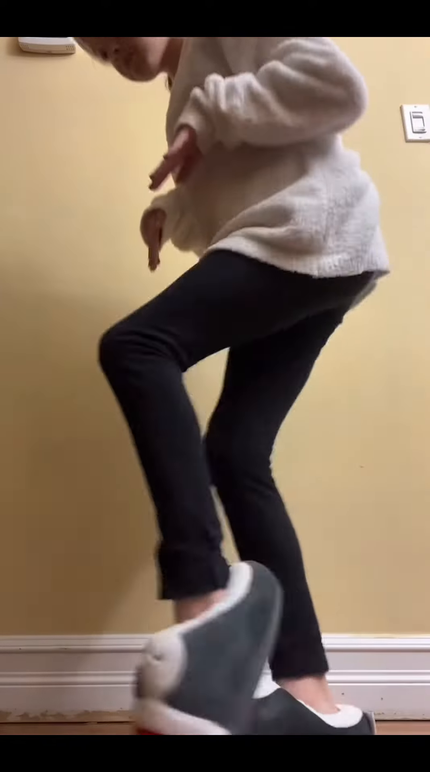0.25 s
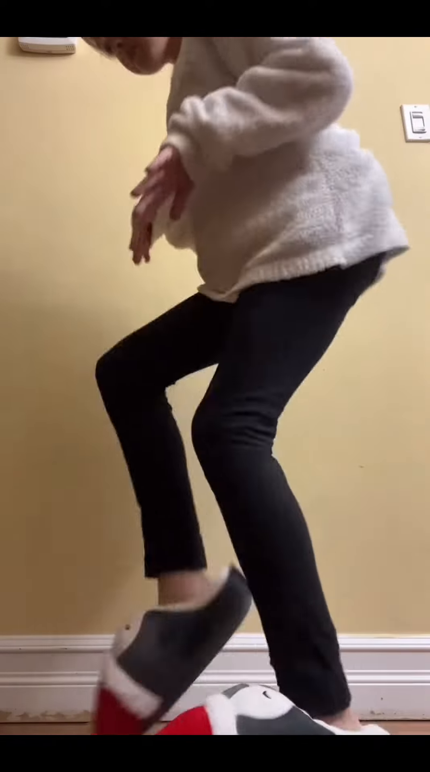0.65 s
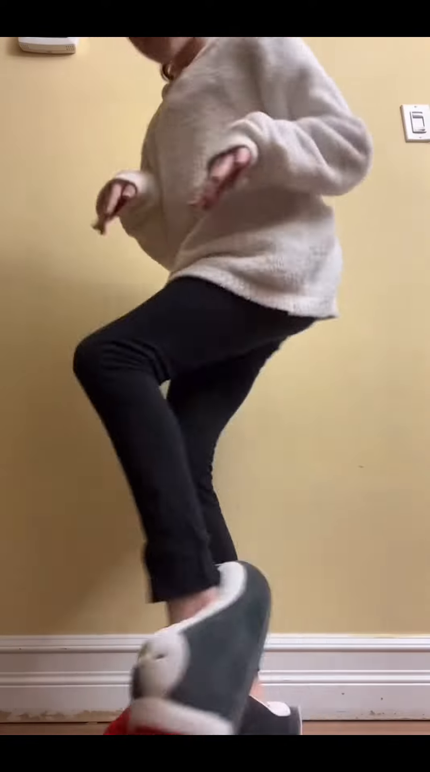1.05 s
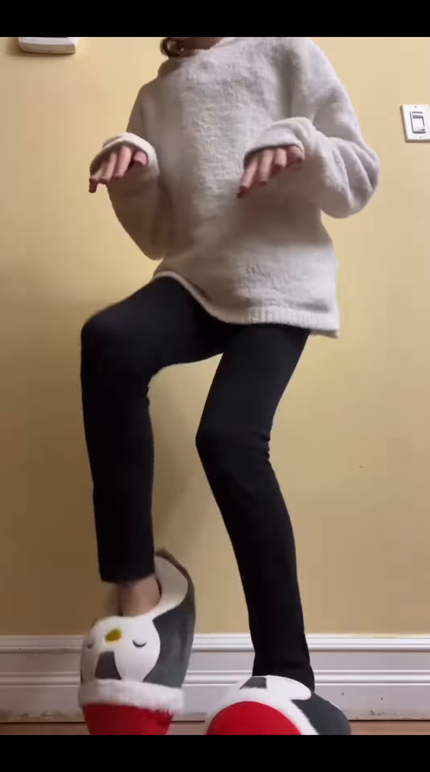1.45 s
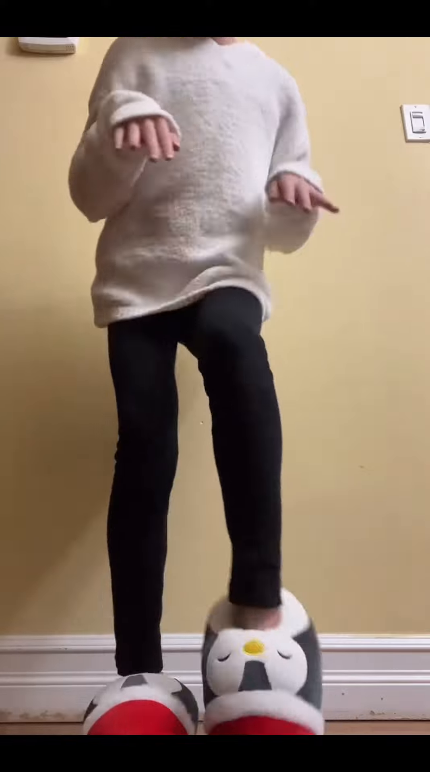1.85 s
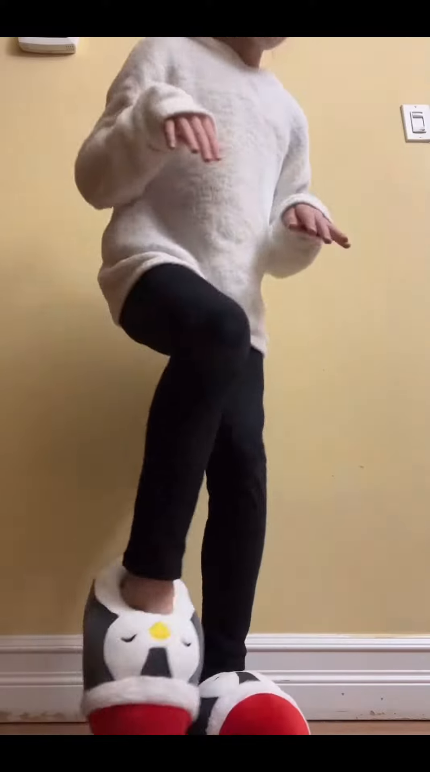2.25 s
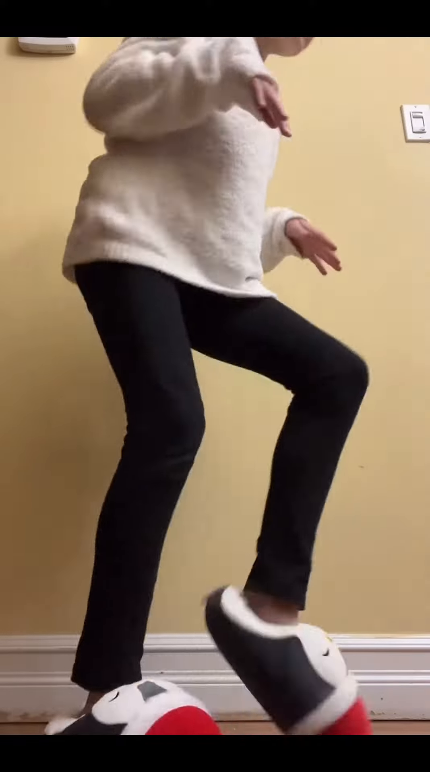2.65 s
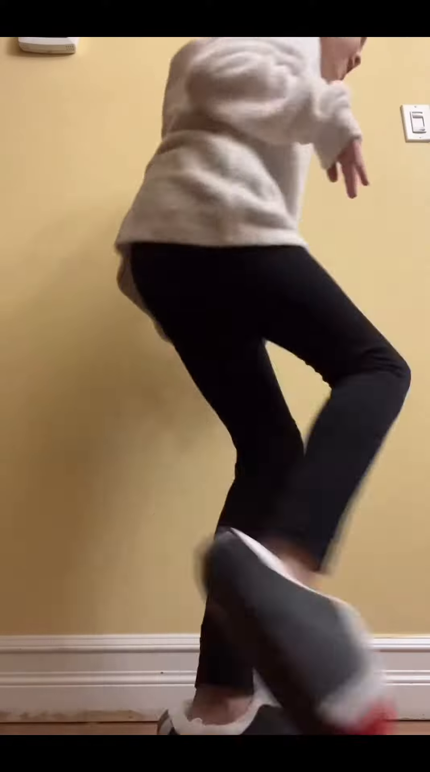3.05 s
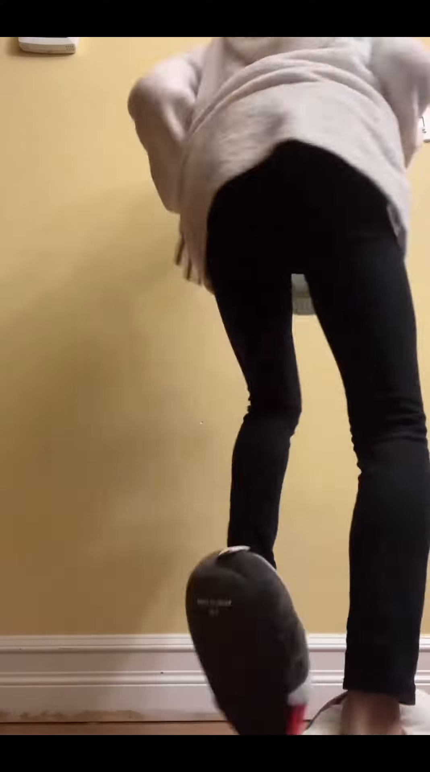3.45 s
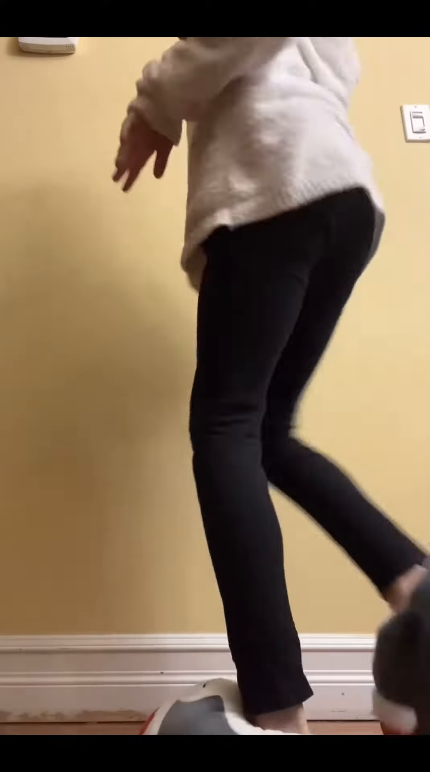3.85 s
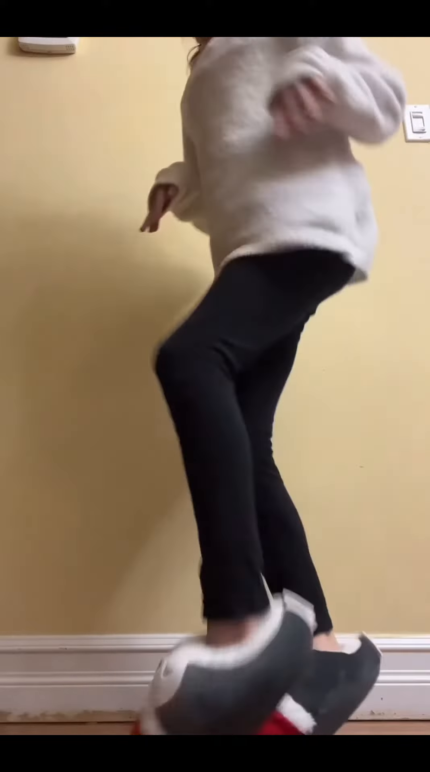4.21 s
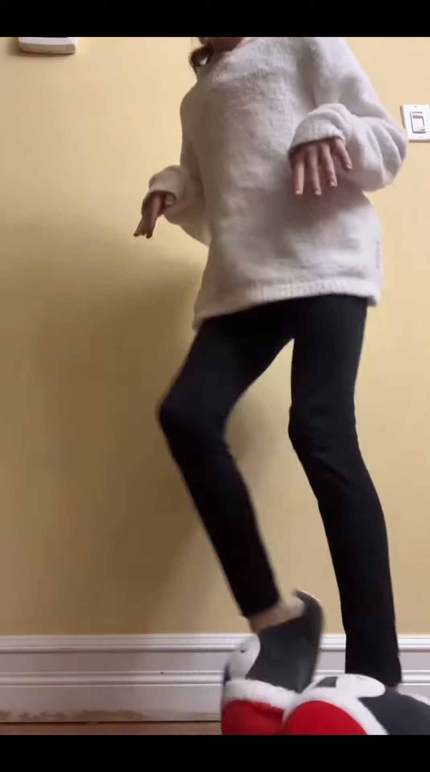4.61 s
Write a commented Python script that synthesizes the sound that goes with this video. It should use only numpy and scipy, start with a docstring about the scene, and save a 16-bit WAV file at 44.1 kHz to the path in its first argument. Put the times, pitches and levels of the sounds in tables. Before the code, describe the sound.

Soft, hissy swishes follow one another in a loose rhythm as plush slippers shuffle over varnished floorboards. Cushioned footfalls and small catching clicks fall between the slides. In the second half a sole squeaks shortly twice, and a few more scuffs lead to a slightly heavier step. The sound is close, in a small room with little echo, a quiet low rumble and a faint electrical hum.

```python
"""Soft swishes and dull pats: someone dances in plush slippers on a wooden floor, close by in a small room.
The cloth soles catch and slide by friction, push on the boards and squeeze air out as they land.
Twice a pivoting sole squeaks on the varnish by stick-slip motion; fast soles give tiny whistles.
Under it lie the low rumble of the house and a faint mains hum."""
import sys
import numpy as np
from scipy import signal
from scipy.fft import rfft, irfft, next_fast_len
from scipy.io import wavfile
from scipy.ndimage import map_coordinates

SR = 44100
rng = np.random.default_rng(int(sys.argv[2]) if len(sys.argv) > 2 else 0)


def log_audio(samples):
    """Write samples as a 16-bit WAV file to the path given in sys.argv[1]."""
    # one column per channel
    frames = np.atleast_2d(samples).T
    # limit to full scale, then quantise
    limited = np.clip(frames, -1, 1)
    pcm = np.round(limited * 32767).astype(np.int16)
    wavfile.write(sys.argv[1], SR, pcm)


N = 210562

# Spectrum of cloth rubbing on wood: frequency_hz, density_db
CLOTH_SPECTRUM = [(210, -16), (350, -10), (404, -3), (582, -7.5), (630, 1.5), (682, -1), (1050, 0.5),
                  (1350, 0.5), (1460, 2), (2760, 6), (5390, 3.5), (7170, 3.5), (9100, -14.5), (13800, -23),
                  (15600, -21)]
# A sole lands and slides, about every 0.4 s (scuff and sizzle are relative to the rub):
# start_s, rub_db, rise_s, fade_s, scuff_db, sizzle_db
SOLE_SLIDES = [(.04, -33, 0.093, .13, -5, -21), (.416, -34, 0.081, 0.17, -6, -14),
               (0.86, -33, 0.086, 0.049, -6.5, -11.5), (1.198, -39.5, 0.13, 0.14, -3.5, -9.5),
               (1.6, -40.5, 0.063, 0.087, -5, -23.5), (1.825, -34.5, 0.035, 0.083, -4, -8),
               (2.016, -41.5, .075, 0.11, -3, -14.5), (2.394, -42, 0.074, 0.15, -5, -25),
               (2.785, -39, 0.099, 0.17, -5, -14), (3.184, -35, 0.1, 0.15, -9.5, -6.5),
               (3.635, -35.5, 0.061, 0.33, -12.5, -11), (4.08, -37, 0.057, 0.1, -8, -4),
               (4.485, -42.5, .014, 0.19, -3.5, -9.5), (4.712, -28, 0.032, 0.039, -4, -4.5)]


def cloth_friction(scuff_hz=1900, hiss_hz=5600, sizzle_hz=8200):
    """Sliding friction: fibres slip as separate ticks under a light touch, a dense swish under weight."""
    # Resonances of the slipper: frequency_hz, width_hz, gain_db
    slipper_modes = [(605, 21, -25), (1330, 52, -2), (1585, 40, -8), (2550, 55, -44)]
    rub_db, pressure_db, speed_db = footwork()
    slips_per_s = 450 + 5.6e5 * amp(rub_db + pressure_db)
    tick_share = np.clip(0.38 - 0.04 * pressure_db, 0.05, 0.8)
    slips = np.sqrt(tick_share) * grains(slips_per_s, spread_db=5)
    slips += np.sqrt(1 - tick_share) * rng.standard_normal(N)
    slips *= amp(1.18 * wobble(170))  # the fibres let go in clumps
    slips = reflected(slips, delay_s=0.0006, share=0.25)  # off the floor
    slips = reflected(slips, delay_s=0.003, share=0.18)  # off the skirting board
    slips = coloured(slips + resonate(slips, slipper_modes), CLOTH_SPECTRUM)
    low = lambda f: 1 / (1 + (f / scuff_hz) ** 5)
    high = lambda f, edge_hz: 1 - 1 / (1 + (f / edge_hz) ** 8)
    scuff = unit(filtered(slips, low))
    rub = unit(filtered(slips, lambda f: 1 - low(f) - high(f, sizzle_hz)))
    sizzle = unit(filtered(slips, lambda f: high(f, sizzle_hz)))
    hiss = filtered(rub, lambda f: high(f, hiss_hz))
    bright_db = np.clip(1 + 0.1 * speed_db, -5, 3)  # a slow sole says "sh", a fast one "ss"
    rub = amp(bright_db) * hiss + amp(-0.4 * bright_db) * (rub - hiss)
    return amp(rub_db) * (rub + amp(pressure_db) * scuff + amp(speed_db) * sizzle)


def footwork(load_db_per_s=97.5, speedup_db_per_s=50, brush_scuff_db=-7.5):
    """Incoherent strokes add in power. In dB: rub, and scuff (pressure) and sizzle (speed) re rub."""
    # A foot pushes off and brushes away, fast and light: peak_s, rub_db, rise_s, fade_s, sizzle_db
    brushes = [(.252, -34, .187, 0.11, -4.5), (.683, -38.5, 0.14, 0.019, -3.5),
               (.73, -40.5, .03, 0.089, -2.5), (1.012, -35.5, 0.14, 0.15, 0), (1.421, -40.5, 0.08, 0.14, 1),
               (1.512, -41.5, .095, 0.016, -14), (1.759, -50.5, 0.18, 0.35, -4),
               (2.194, -44, 0.1, 0.087, -3), (2.265, -49.5, .045, 0.11, 1.5),
               (2.546, -47, 0.12, 0.26, -5.5), (2.612, -39.5, 0.023, 0.11, -2),
               (2.984, -53.5, 0.033, 0.32, 4), (3.04, -42.5, 0.028, 0.069, -17),
               (3.402, -38.5, .187, 0.16, -5), (3.83, -38, 0.097, 0.16, 0), (3.932, -40, 0.054, 0.045, -7),
               (4.253, -36, 0.065, 0.11, -3.5), (4.389, -50, 0.021, 0.083, -5), (4.664, -42, 0.1, 0.092, 4)]
    rub, scuff, sizzle = np.zeros((3, N))
    for start_s, rub_db, rise_s, fade_s, scuff_db, sizzle_db in SOLE_SLIDES:
        power, shift_s = stroke(start_s + rise_s, rub_db, rise_s, fade_s, rise_db=19)
        power *= np.arange(N) >= start_s * SR
        rub += power
        scuff += power * amp(scuff_db + load_db_per_s * shift_s) ** 2  # grows as the weight comes on
        sizzle += power * amp(sizzle_db + speedup_db_per_s * shift_s) ** 2  # starts dull, brightens
    for peak_s, rub_db, rise_s, fade_s, sizzle_db in brushes:
        power, shift_s = stroke(peak_s, rub_db, rise_s, fade_s, rise_db=21)
        rub += power
        scuff += power * amp(brush_scuff_db + load_db_per_s * shift_s) ** 2
        sizzle += power * amp(sizzle_db) ** 2
    return 10 * np.log10([rub, scuff / rub, sizzle / rub])


def stroke(peak_s, level_db, rise_s, fade_s, rise_db, fade_db=21, half_shift_s=0.069):
    """Power envelope of one stroke, and the time from its peak, limited to the shift of weight."""
    t = np.arange(N) / SR - peak_s
    drop_db = np.where(t < 0, rise_db * np.abs(t / rise_s) ** 1.255, fade_db * np.abs(t / fade_s) ** 0.88)
    power = amp(level_db - np.minimum(drop_db, 210)) ** 2
    return power, np.clip(t, -half_shift_s, half_shift_s)


def snags(t60_s=0.0068, crumble=0.51, cutoff_hz=9000):
    """Impulse response: the tread snaps free and rings, with a short crumble of fibres after the tick."""
    # The tread catches and lets go: start_s, peak_db
    releases = [(.0767, -30), (.195, -15.5), (.2047, -17), (.2225, -17.5), (.2518, -18), (.3752, -17.5),
                (.652, -26), (.6674, -21), (.6814, -22), (1.498, -21.5), (1.509, -18.5), (1.828, -28),
                (1.838, -22), (2.2656, -35), (2.603, -27), (3.0344, -22), (3.7226, -29), (3.8352, -15.5)]
    # Resonances of the tread: frequency_hz, width_hz, gain_db
    tread_modes = [(3660, 1400, 17), (6040, 920, 22)]
    out, t = np.zeros(N), np.arange(SR // 40) / SR
    for start_s, peak_db in list(releases) + fibre_catches():
        snap = (t == 0) + crumble * amp(-60 * t / t60_s) * rng.standard_normal(len(t))
        tick = softened(resonate(snap, tread_modes), cutoff_hz)
        add(out, start_s, amp(peak_db) * tick / np.abs(tick).max())
    return out


def fibre_catches(count=4, within_s=0.045, offset_db=-1, spread_db=4):
    """Static friction: fibres catch at first touch and at random just after. Gives start_s, peak_db."""
    ticks = []
    for (start_s, rub_db, *_), (when, size) in zip(SOLE_SLIDES, rng.random((len(SOLE_SLIDES), 2, count))):
        times_s = start_s + within_s * (when - when.min())
        ticks += zip(times_s, rub_db + offset_db + spread_db * (2 * size - 1))
    return ticks


def squeaks(slip_s=3e-5, rocking=0.89, grit=2.3):
    """Stick-slip oscillation: a pivoting sole grips and slips faster and more evenly, then lets go."""
    # One table per squeak: time_s, slip_rate_hz, gain_db, roughness (0 to 1)
    pivots = [
        [(3.394, 1200, -33, 0.59), (3.401, 1180, -32, 0.44), (3.4065, 1880, -21, 0.41),
         (3.4085, 1760, -14.5, .26), (3.412, 1840, -12, 0.15), (3.4142, 2200, -21, 0.22)],
        [(3.772, 740, -24, 0.5), (3.782, 700, -17.5, 0.11), (3.789, 960, -15, 0.26), (3.797, 1110, -17.5, .2),
         (3.8003, 1280, -12.5, 0.05), (3.8034, 1640, -9.5, 0.23), (3.8043, 440, -36, 0.4)],
    ]
    # Resonances of the sole: frequency_hz, width_hz, gain_db
    sole_modes = [(1640, 1170, -4), (3900, 3100, -9.5), (6400, 1200, -12)]
    out, t = np.zeros(N), np.arange(N) / SR
    for rows in pivots:
        rate_hz, gain_db, roughness = curves(rows)
        cycles = np.cumsum(rate_hz * (1 + 0.5 * roughness * wobble(1200))) / SR
        pulses = np.exp(-((cycles % 1 - 0.5) / rate_hz / slip_s) ** 2)
        sway = -rocking * np.cos(2 * np.pi * cycles)  # the whole sole rocks with each slip
        noise = grit * roughness * rng.standard_normal(N)
        force = (1 - roughness) * unit(pulses - pulses.mean()) + sway + noise
        sliding = (t > rows[0][0]) & (t < rows[-1][0])
        out += amp(gain_db) * force * sliding
    band_pass = lambda f: f ** 2 / (f ** 2 + 450 ** 2) / np.sqrt(1 + (f / 8800) ** 12)
    return filtered(resonate(out, sole_modes), band_pass)


def pats(attack_s=0.0012, padding_hz=600):
    """Cushioned impact: a padded foot excites the low modes of the boards, then settles."""
    # Weight comes down: start_s, peak_db, settle_s
    footfalls = [(0.323, -38.5, 0.029), (.381, -40.5, 0.12), (1.066, -41.5, 0.033), (1.387, -38, 0.069),
                 (1.448, -39, 0.021), (1.502, -37, 0.11), (1.745, -41.5, 0.09), (2.176, -41, .1),
                 (2.287, -41.5, 0.036), (2.474, -42.5, 0.43), (4.417, -34.5, .04), (4.443, -41, 0.034),
                 (4.644, -41, 0.019), (4.741, -29.5, 0.24)]
    # Modes of the floorboards: frequency_hz, width_hz, gain_db
    board_modes = [(134, 17, -10.5), (207, 32, 4), (240, 210, 1), (340, 320, -12), (510, 400, -15)]
    out, t = np.zeros(N), np.arange(SR // 5) / SR
    for start_s, peak_db, settle_s in footfalls:
        push = np.exp(-t / attack_s) * t / attack_s
        settling = 2.5 * amp(-30 * t / settle_s) * rng.standard_normal(len(t))
        thud = softened(resonate(push + settling, board_modes), padding_hz)
        add(out, start_s, amp(peak_db) * thud / np.abs(thud).max())
    return out


def air_puffs(relative_width=0.98, cloth_gain=0.033):
    """Cavity resonance: air squeezed from under a sole puffs hollowly, with a brush of cloth on top."""
    # A sole is pressed flat on trapped air: start_s, level_db, pitch_hz, length_s
    landings = [(.12, -56, 1100, 0.02), (0.3776, -32, 922, 0.0024), (0.505, -40.5, 670, 0.021),
                (1.034, -39.5, 1340, 0.025), (1.495, -38, 880, 0.0053), (1.509, -39, 683, 0.015),
                (1.857, -29, 1490, 0.017), (2.603, -34.5, 1220, 0.0078), (3.939, -33, 1170, 0.0058),
                (4.141, -39.5, 1550, 0.0079), (4.736, -30, 880, 0.013)]
    out, t = np.zeros(N), np.arange(SR // 5) / SR
    for start_s, level_db, pitch_hz, length_s in landings:
        air = rng.standard_normal(len(t))
        gap = [(pitch_hz, relative_width * pitch_hz, 0)]
        puff = unit(resonate(resonate(air, gap), gap))
        cloth = cloth_gain * unit(coloured(air, CLOTH_SPECTRUM))
        swell = 2 * t / length_s
        add(out, start_s, amp(level_db) * swell * np.exp(1 - swell) * (puff + cloth))
    return out


def chirps(log_rise=0.49, jitter=0.16):
    """Friction-driven vibration: small patches of a fast sole whistle upward for a few milliseconds."""
    # Tiny whistles of the sole: centre_s, peak_db, pitch_hz, length_s
    whistles = [(1.089, -33, 5640, .0056), (2.963, -34, 7170, 0.014), (2.984, -47, 9700, .012),
                (3.004, -31, 7130, 0.0048), (3.4143, -24.5, 6120, 0.0081), (3.416, -32, 13500, 0.0089),
                (3.803, -20, 7640, .004), (3.808, -18, 6660, 0.0052), (3.898, -32, 9600, 0.0081),
                (4.261, -24, 6650, 0.0044), (4.259, -32, 2680, .011), (4.268, -30, 7480, .0057)]
    out = np.zeros(N)
    for centre_s, peak_db, pitch_hz, length_s in whistles:
        progress = np.linspace(-0.5, 0.5, max(8, round(length_s * SR)))
        glide_hz = pitch_hz * np.exp(log_rise * progress)
        glide_hz *= 1 + jitter * rng.standard_normal(len(progress))
        tone = np.sin(2 * np.pi * np.cumsum(glide_hz) / SR)
        add(out, centre_s - length_s / 2, amp(peak_db) * np.cos(np.pi * progress) ** 2 * tone)
    return out


def reflected(x, delay_s, share):
    """Comb filtering: a sound interferes with its reflection, whose path drifts as the foot moves."""
    n = np.arange(N)
    return x + share * np.interp(n - delay_s * SR * np.exp(0.35 * wobble(3)), n, x)


def room(x, predelay_s=0.003):
    """Reverberation: reflections from the bare walls decay exponentially, the treble first."""
    # Reverberation time of the room: frequency_hz, t60_s
    decay_times = [(150, 0.3), (1100, 0.25), (1800, 0.34), (6000, 0.13), (14000, 0.1)]
    hz, t, spectra = signal.stft(rng.standard_normal(SR * 3 // 5), SR, nperseg=256)
    decay = amp(-60 * t / along(decay_times, hz)[:, None])
    tail = signal.istft(spectra * decay, SR, nperseg=256)[1]
    tail = np.pad(tail / np.linalg.norm(tail), (round(predelay_s * SR), 0))
    return signal.fftconvolve(x, tail)[:N]


def house(rumble_db=-55, boom_db=-56):
    """Background noise: rumble, faint hiss, a booming standing wave and a slightly unsteady mains hum."""
    # Rumble and hiss of the house: frequency_hz, density_db
    noise_spectrum = [(12, -33), (25, -17), (42, 2.5), (70, 6), (110, -3), (150, -3.5), (210, -0.5),
                      (430, -7.5), (600, -13), (1100, -19.5), (1700, -27), (4400, -21), (6700, -14.5),
                      (9500, -35), (14000, -26), (15600, -43)]
    # The room's lowest standing wave: frequency_hz, width_hz, gain_db
    room_mode = [(73.3, 42, 0)]
    # Partials of the hum: pitch_hz, peak_db
    hum_partials = [(60, -66), (120, -57), (280, -71.5)]
    air = coloured(rng.standard_normal(N), noise_spectrum)
    rumble_rms = filtered(air, lambda f: f < 400).std()
    boom = unit(resonate(resonate(rng.standard_normal(N), room_mode), room_mode))
    t = np.arange(N) / SR
    hum = sum(amp(db) * np.sin(2 * np.pi * hz * t + 0.32 * wobble(4)) for hz, db in hum_partials)
    return amp(rumble_db) * air / rumble_rms + amp(boom_db) * boom + hum


def amp(db):
    """Decibels to amplitude ratio."""
    return 10 ** (np.asarray(db) / 20)


def unit(x):
    """Normalisation to rms 1."""
    return x / np.sqrt(np.mean(x ** 2) + 1e-20)


def along(points, hz):
    """Interpolation of (frequency_hz, value) points on a logarithmic frequency axis."""
    f, values = np.transpose(points)
    return np.interp(np.log(hz + 1), np.log(f + 1), values)


def curves(rows):
    """Linear interpolation: one value per sample for each column after the time."""
    times_s, *columns = np.transpose(rows)
    return [np.interp(np.arange(N) / SR, times_s, column) for column in columns]


def wobble(rate_hz):
    """Smooth random modulation: a spline through rate_hz knots a second."""
    knots = rng.standard_normal(int(N * rate_hz / SR) + 4)
    return map_coordinates(knots, [np.arange(N) * rate_hz / SR])


def grains(rate_hz, spread_db):
    """Shot noise of rms 1: random impulses of unequal size, larger where they come more rarely."""
    size = amp(spread_db * np.clip(rng.standard_normal(N), -2, 2)) / np.sqrt(rate_hz)
    return unit((rng.random(N) < rate_hz / SR) * size * rng.choice([-1, 1], N))


def filtered(x, response):
    """Linear filtering: the spectrum of x times a complex frequency response."""
    size = next_fast_len(len(x) + SR // 4)
    return irfft(rfft(x, size) * response(np.fft.rfftfreq(size, 1 / SR)), size)[:len(x)]


def coloured(x, spectrum):
    """Spectral shaping by (frequency_hz, gain_db) points."""
    return filtered(x, lambda f: amp(along(spectrum, f)))


def softened(x, cutoff_hz):
    """A critically damped two-pole low-pass."""
    return filtered(x, lambda f: 1 / (1 + 1j * f / cutoff_hz) ** 2)


def resonate(x, modes):
    """Modal superposition: x drives damped resonators in parallel."""
    return filtered(x, lambda f: sum(amp(db) * 1j * f * width / (hz * hz - f * f + 1j * f * width)
                                     for hz, width, db in modes))


def add(track, start_s, sound):
    """Mix a sound into the track from start_s on."""
    start = max(0, round(start_s * SR))
    part = track[start:start + len(sound)]
    part += sound[:len(part)]


def scene():
    """Superposition of the slippers' direct sound, its reverberation and the house, in mono."""
    swish, squeal = cloth_friction(), squeaks()
    contacts = pats() + air_puffs() + snags() + chirps()
    walls = room(amp(-15.5) * swish + amp(-9) * contacts + amp(-14.5) * squeal)
    return (swish + squeal + contacts + walls + house())[None]


def record(dry):
    """Band limiting: an ideal low-pass removes everything above 15.8 kHz."""
    return np.array([filtered(channel, lambda hz: hz < 15800) for channel in dry])


dry = scene()
out = record(dry)
log_audio(out)
```